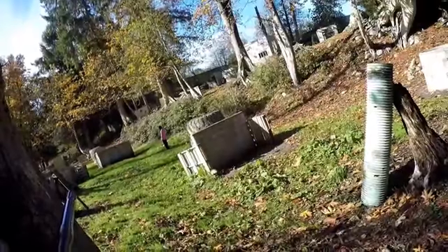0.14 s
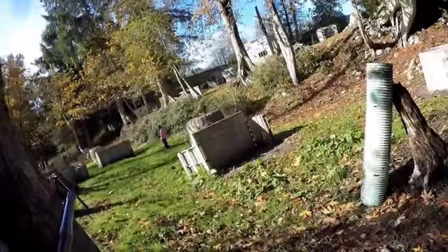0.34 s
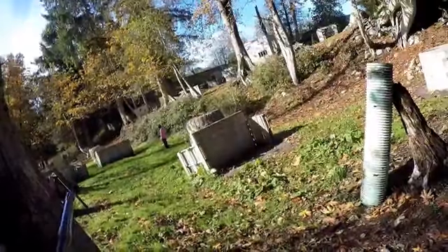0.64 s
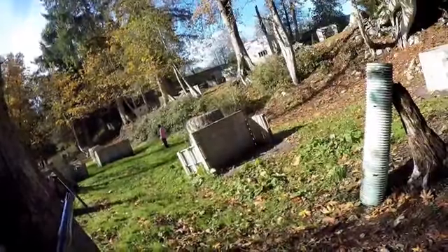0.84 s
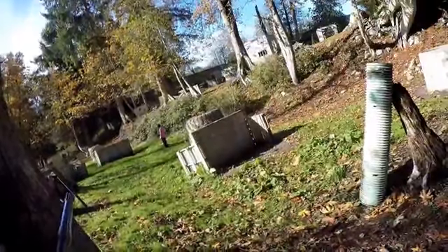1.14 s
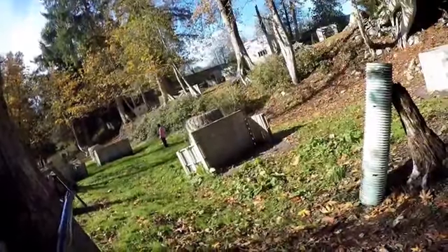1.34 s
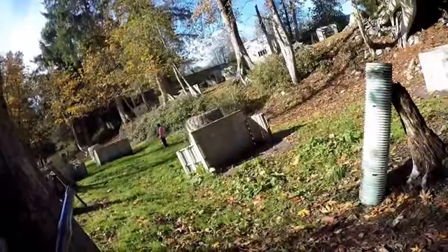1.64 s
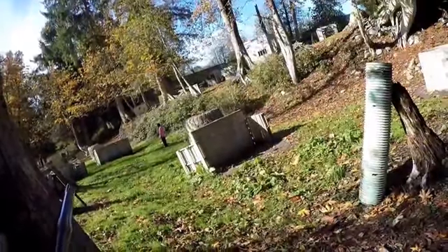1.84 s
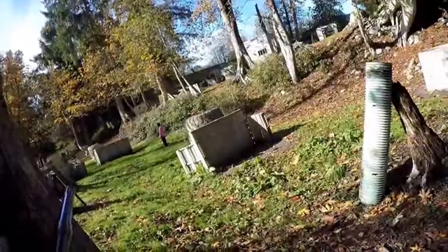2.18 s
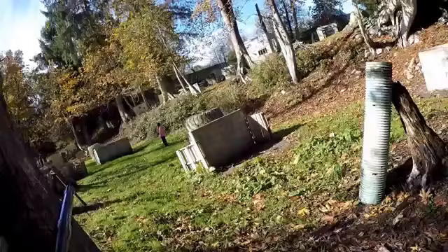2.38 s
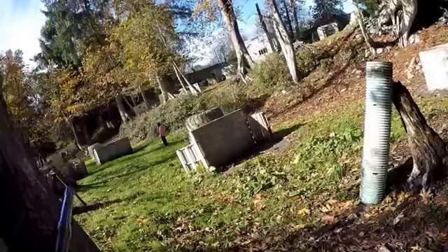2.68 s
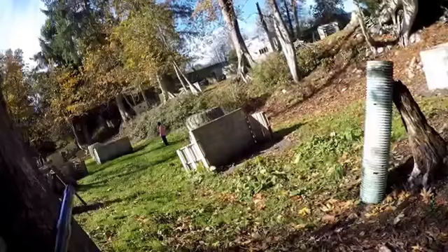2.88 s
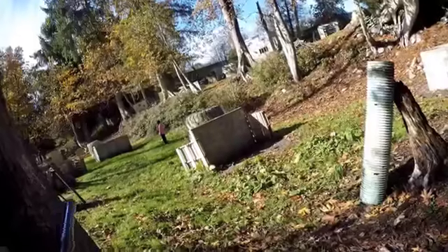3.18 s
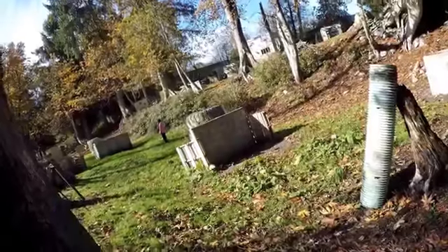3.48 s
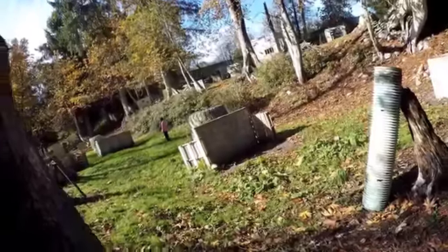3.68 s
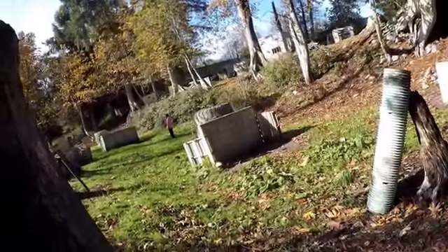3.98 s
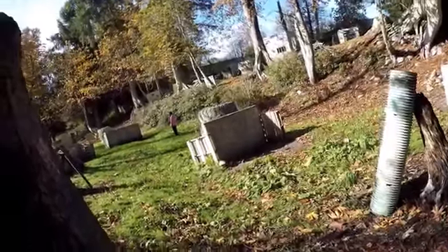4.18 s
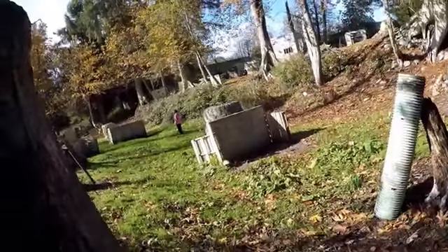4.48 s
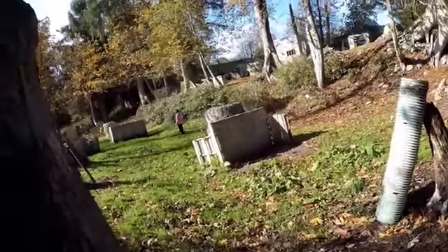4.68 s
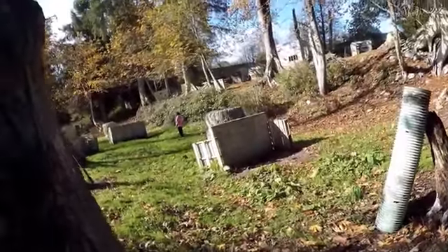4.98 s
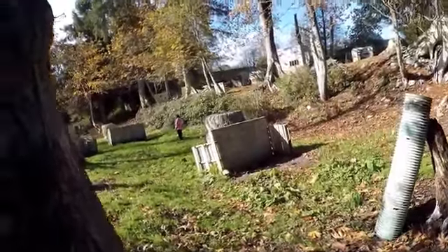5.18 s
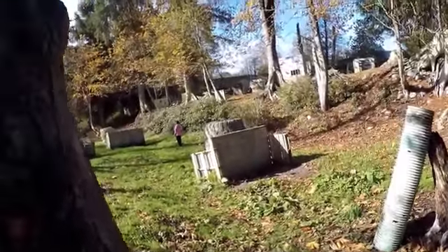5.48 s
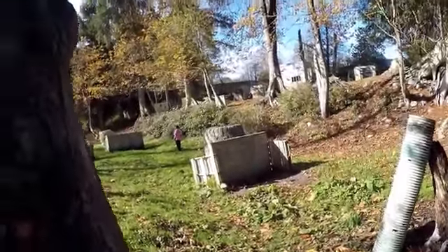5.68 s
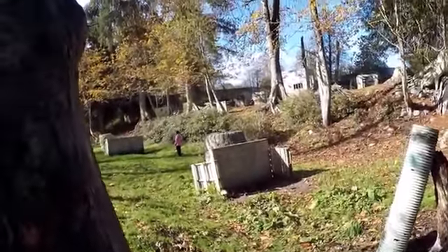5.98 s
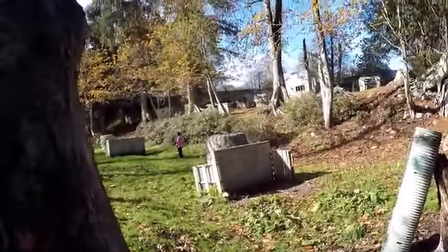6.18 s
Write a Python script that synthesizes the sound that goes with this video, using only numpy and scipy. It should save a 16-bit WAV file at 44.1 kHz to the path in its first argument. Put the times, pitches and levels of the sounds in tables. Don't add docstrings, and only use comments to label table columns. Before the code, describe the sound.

Close to a small camera microphone outdoors, a paintball marker fires one hard, hollow metallic pop, then after a pause a quick pair, then three more. Each has a tiny trigger click, gas blast, bolt clack and short echo from the trees. Afterwards it is quiet: faint distant bursts, soft plastic knocks, a small crackling splatter of paint near the end, and low wind rumble.

```python
import sys
import numpy as np
from scipy import signal
from scipy.fft import rfft, irfft, next_fast_len
from scipy.io import wavfile

SR = 44100
rng = np.random.default_rng(int(sys.argv[2]) if len(sys.argv) > 2 else 0)


def boost(x):
    u = np.asarray(x, float) / 20
    return 10 ** u


def to_wav(s):
    ch = np.atleast_2d(s).T
    pcm = np.round(np.clip(ch, -1, 1) * 32767)
    wavfile.write(sys.argv[1], SR, pcm.astype(np.int16))


N = 279153

# start_s, blast_db, bolt_lag_s, seal (ball in barrel: -1 loose, 1 tight), echo_db
NEAR_SHOTS = [
    (0.147, -11, 0.0045, -0.1, -50.5),
    (1.7339, -11.5, 0.0047, 0.43, -48),
    (1.8650, -10.5, 0.0045, 0.27, -47),
    (2.5430, -11.5, 0.0049, 0.026, -49.5),
    (2.7389, -12, 0.0039, -.9, -47),
    (2.8440, -10, 0.0053, 0.64, -47.5),
]
# pitch_hz, level_db, t60_s (time to die by 60 dB)
FRAME_MODES = [(963, -9, .07), (1870, -0.1, 0.038), (2410, -3, .05), (3600, -4, 0.036), (3873, -6.5, 0.028),
               (7400, -16, 0.043)]
# pitch_hz, level_db (per Hz)
FAR_SPECTRUM = [(180, -27.5), (300, 3.5), (396, -17), (444, -2), (515, -16), (606, -13), (1400, -8.5),
                (1790, 1), (3490, -1), (4390, -8), (9030, -16.5), (10500, -20), (15000, -26)]
# pitch_hz, width_hz, lift_db
HOUSING_PEAKS = [(960, 120, 0), (1850, 110, 2), (2360, 62, 8), (3520, 390, 5.5), (3890, 150, 7.5),
                 (7250, 350, 4.5), (10250, 430, 5)]


def at_hz(points, hz):
    point_hz, point_db = np.transpose(points)
    return np.interp(np.log(hz + 1), np.log(point_hz), point_db)


def noise(spectrum, peaks=()):
    size = next_fast_len(N)
    hz = np.arange(size // 2 + 1) * SR / size
    db = at_hz(spectrum, hz)
    for centre_hz, width_hz, lift_db in peaks:
        db = db + lift_db / (1 + (2 * (hz - centre_hz) / width_hz) ** 2)
    x = irfft(rfft(rng.standard_normal(size)) * boost(db), size)[:N]
    return x / np.std(x)


def drift(rate_hz):
    knots = rng.standard_normal(N // 64 + 2)
    smoother = signal.butter(1, rate_hz * 128 / SR, output="sos")
    slow = signal.sosfiltfilt(smoother, knots)
    return np.interp(np.arange(N) / 64, np.arange(len(slow)), slow / np.std(slow))


def clicks(times, db):
    out = np.full(N, 1e-18)
    places = (np.asarray(times) * SR).round().astype(int)
    np.add.at(out, np.clip(places, 0, N - 1), boost(db))
    return out


def ring(x, hz, t60):
    radius = boost(-60 / (t60 * SR))
    angle = 2 * np.pi * hz / SR
    return signal.lfilter([0, np.sin(angle)], [1, -2 * radius * np.cos(angle), radius * radius], x)


def strike(times, db, modes, spread_db):
    luck = spread_db * rng.standard_normal((len(times), len(modes)))
    out = np.zeros(N)
    for k, (hz, level_db, t60) in enumerate(modes):
        out += (-1) ** k * ring(clicks(times, db + level_db + luck[:, k]), hz, t60)
    return out


def fade(times, db, rise_s, t60):
    fall = boost(-120 / (t60 * SR))
    rise = np.exp(-1 / (rise_s * SR))
    power = signal.lfilter([1 - rise], [1, -rise], clicks(times, 2 * np.asarray(db)))
    return np.sqrt(signal.lfilter([1], [1, -fall], power))


def puff(times, db, rise_s, hold_s, fall_s):
    out = np.zeros(N)
    t = np.arange(SR // 20) / SR
    shape = np.clip(t / rise_s, 0, 1) * np.exp(-np.maximum(t - rise_s - hold_s, 0) / fall_s)
    for s, level_db in zip(times, db):
        out[round(s * SR):][:len(t)] += boost(level_db) * shape
    return out


def salvo(times, db, steps):
    after, step_db = np.transpose(steps)
    return (times[:, None] + after).ravel(), (db[:, None] + step_db).ravel()


def swells(rows):
    t = np.arange(N) / SR
    return sum(boost(2 * db) * np.exp(-((t - s) / length) ** 2) for s, db, length in rows)


def band_filter(x, order, edge_hz, kind):
    return signal.sosfilt(signal.butter(order, edge_hz, kind, fs=SR, output="sos"), x)


def barrel():
    # after_s, level_db
    surges = [
        (0, -5),
        (.0005, 4.5),
        (.0013, -3.5),
        (.0023, -3.5),
        (.0033, -8.5),
        (.0062, -14.5),
    ]
    # pitch_hz, level_db, t60_s
    groups = [
        [(389, -11, 0.024), (538, -15.5, 0.025)],
        [(786, -14.5, 0.026), (1180, -13, 0.0053), (1520, -12.5, 0.0076)],
        [(1931, -1.5, .022)],
        [(2493, -6, .016)],
        [(3070, -7.5, 0.014), (3450, -5.5, 0.019), (3880, -14.5, 0.01177)],
    ]
    lifts = [0, -5.5, -1, 0.1, -2.5]
    seal_lifts = [1.5, -9, 3, -0.17, -3.5]
    # spread_db, the chance in each drive; the breech is steadiest
    spreads = [1.5, 3.3, 2.2, 2.2, 2.5]
    s, blast_db, _, seal, _ = np.transpose(NEAR_SHOTS)
    rung = []
    for group, lift_db, seal_db, spread_db in zip(groups, lifts, seal_lifts, spreads):
        times, db = salvo(s, blast_db + lift_db + seal_db * seal, surges)
        rung.append(strike(times, db, group, spread_db))
    breech, *bore = rung
    return -band_filter(sum(bore), 2, [620, 6000], "band") - band_filter(breech, 4, 310, "high")


def bolt():
    # pitch_hz, level_db, t60_s
    modes = [(3565, -10.5, 0.01172), (5720, -8, 0.012), (6940, 0.1, 0.0051), (7540, -11.5, 0.0076),
             (9560, -10.5, 0.011), (10870, -16, 0.016), (13240, -20, 0.008)]
    # after_s, level_db
    chatter = [
        (0, 4.5),
        (.0007, -8),
        (.0019, -4.5),
        (.003, -5),
    ]
    s, blast_db, lag, seal, _ = np.transpose(NEAR_SHOTS)
    times, db = salvo(s + lag, blast_db - 4.5 + 2.2 * seal, chatter)
    return strike(times, db, modes, spread_db=2.2)


def sear(hiss):
    # start_s, level_db
    snaps = [
        (.1256, -28),
        (1.7120, -27.5),
        (1.8445, -29.5),
        (2.5220, -28),
        (2.7183, -29.5),
        (2.8247, -28),
    ]
    # pitch_hz, level_db, t60_s
    modes = [(449, -12, 0.016), (1000, 4.5, 0.0051), (1870, -3, 0.021), (3377, -5.5, 0.01206),
             (5070, -10, .015), (7000, -8, .012)]
    s, db = np.transpose(snaps)
    out = strike(s, db, modes, spread_db=0.0)
    out += puff(s, db - 7, 0.00038, 0.0012, 0.0047) * hiss
    return out + ring(clicks(s - .002, db - 20), 7100, 0.0081)


def vent(hiss):
    s, blast_db, _, seal, _ = np.transpose(NEAR_SHOTS)
    rush = puff(s + 0.0011, blast_db - 8 - 4.5 * seal, 0.0029, 0.0022, 0.0022)
    leak = puff(s - .0045, blast_db - 35.5, 0.00089, .004, .001)
    return hiss * (rush + leak)


def recoil():
    s, blast_db = np.transpose(NEAR_SHOTS)[:2]
    out = strike(s + .004, blast_db - 23, FRAME_MODES, spread_db=4.5)
    out += ring(clicks(s + 0.0014, blast_db - 20), 80, 0.1)
    out += ring(clicks(s + 0.0053, blast_db - 22.5), 150, .06)
    return out + ring(clicks(s + 0.0035, blast_db - 16.5), 220, 0.03)


def marker():
    # pitch_hz, level_db (per Hz)
    gas = [(300, -21), (900, -11.5), (2000, -2.5), (3700, -4.5), (4830, -7.5), (5800, -4), (6960, -3.5),
           (8360, -16), (9710, -11.5), (12900, -11.5), (14500, -11.5), (16000, -30)]
    hiss = noise(gas)
    return sear(hiss) + barrel() + bolt() + vent(hiss) + recoil()


def hopper():
    s, *_, echo_db = np.transpose(NEAR_SHOTS)
    out = strike(s + 0.044, echo_db + 13, FRAME_MODES[3:], spread_db=0.0)
    after = 0.01 + 0.22 * rng.random((len(s), 20)) ** 1.3
    knock_db = echo_db[:, None] + 2 - 60 * after
    short = [(hz, level_db, 0.26 * t60) for hz, level_db, t60 in FRAME_MODES]
    return out + strike((s[:, None] + after).ravel(), knock_db.ravel(), short, spread_db=5.0)


def echoes(shot):
    # delay_s, level_db
    trunks = [
        (0.011, -31),
        (0.056, -33.5),
        (.085, -43),
        (0.104, -48),
        (.14, -48),
    ]
    # pitch_hz, level_db (per Hz)
    rattle = [(88, -33), (150, -8.5), (249, -6.5), (398, 4.5), (524, -11), (1360, -12), (1830, 0.5),
              (2700, -17), (3550, -7.5), (6140, -11.5), (11000, -12), (15100, -14.5), (16000, -59.5)]
    # pitch_hz, level_db (per Hz)
    woods = [(120, -59.5), (200, -30), (267, -8), (338, -21), (443, -5.5), (804, -10.5), (980, 1),
             (1110, -16.5), (1880, -4), (2020, -4), (15000, -27)]
    s, *_, echo_db = np.transpose(NEAR_SHOTS)
    dull = band_filter(shot, 2, [700, 4500], "band")
    out = sum(boost(db) * np.roll(dull, round(delay * SR)) for delay, db in trunks)
    early = fade(s + 0.011, echo_db + 15, .003, 0.1)
    out += early * noise(rattle, HOUSING_PEAKS) * boost(0.83 * drift(90))
    late = fade(s + 0.015, echo_db, .02, .6)
    return out + late * noise(woods, HOUSING_PEAKS) * boost(2.7 * drift(40))


def splats():
    # start_s, peak_db
    bursts = [
        (4.9245, -33.5),
        (4.9305, -34),
        (4.9354, -35.5),
        (4.9444, -34.5),
        (4.9524, -42),
    ]
    # pitch_hz, level_db, t60_s
    modes = [(420, -17, 0.039), (1570, -8, 0.017), (2370, 0.5, 0.012), (3640, 0.6, 0.017), (4020, -1, 0.01),
             (5660, -6, 0.0076), (7670, -11.5, 0.0087)]
    s, db = np.transpose(bursts)
    out = strike(s, db - 7, modes, spread_db=2.0)
    out += fade(s, db - 20.5, 0.0017, 0.32) * noise(FAR_SPECTRUM, HOUSING_PEAKS)
    tail = [(900, -30), (1500, -10.5), (1900, -4), (2600, -15), (3600, -8.5), (5000, -27.5)]
    return out + fade(s[:1], db[:1] - 27.5, .02, 1.4) * noise(tail, HOUSING_PEAKS)


def scuffs():
    # start_s, peak_db
    snaps = [
        (0.43, -44.5),
        (0.863, -55),
        (0.935, -43.5),
        (1.3495, -43),
    ]
    # pitch_hz, level_db (per Hz)
    colour = [(1000, -12), (2200, 1), (2900, -9.5), (3600, 4.5), (4500, -17), (5600, -15), (8000, -9),
              (9500, -25)]
    s, db = np.transpose(snaps)
    return puff(s - .003, db - 12, 0.0032, .003, 0.01) * noise(colour)


def far_marker():
    # start_s, report_db, late_echo_db
    far_shots = [(.002, -52, -56.5), (.51, -67, -65), (2.035, -53.5, -56.5), (2.135, -54, -56),
                 (2.226, -53.5, -55.5), (2.96, -60, -51.5), (3.054, -55.5, -56.5), (3.24, -55.5, -55),
                 (3.34, -57, -54.5), (3.425, -57, -57.5), (4.053, -56, -55.5), (4.152, -56.5, -50.5),
                 (4.246, -53.5, -58), (5.68, -55.5, -55.5), (5.787, -57.5, -55), (5.87, -55.5, -57),
                 (5.968, -55, -54.5), (6.045, -59, -55.5)]
    s, report_db, late_db = np.transpose(far_shots)
    wash = np.hypot(fade(s, report_db, 0.0037, 0.17), fade(s + 0.0099, late_db + 3, 0.03, 0.34))
    out = wash * noise(FAR_SPECTRUM, HOUSING_PEAKS) * boost(1.3 * drift(45))
    bright = [(5000, -28), (7300, -10), (9000, -13), (10400, -1.5), (11500, -4), (12800, -5), (15000, -5)]
    bright_peaks = [(10400, 350, 6.8), (12800, 400, 4), (7250, 300, 5)]
    out += fade(s, report_db - 10, .004, .35) * noise(bright, bright_peaks)
    thud = [(120, -18), (230, -1.0), (310, 2.5), (600, -19), (2000, -36)]
    return out + fade(s, report_db - 5.5, 0.0027, 0.16) * noise(thud)


def gear():
    # start_s, peak_db, pitch_hz
    knocks = [(0.3431, -51, 1500), (3.715, -48.5, 2276), (3.8856, -49.5, 1520), (4.0302, -51, 1643),
              (4.0562, -53, 1810), (4.152, -47, 1770), (0.712, -60, 875), (3.68, -56, 937),
              (3.884, -56, 1076), (3.941, -68, 966), (4.014, -56.5, 927), (4.065, -50.5, 1006),
              (4.145, -54.5, 977), (4.485, -57, 1250), (4.585, -55.5, 967), (4.759, -57.5, 1078),
              (4.853, -58.5, 1058), (5.533, -54.5, 1050), (5.605, -61, 850), (3.692, -62, 620),
              (4.029, -56.5, 527), (4.6668, -54, 5610), (5.0584, -58, 5580)]
    out = np.zeros(N)
    age = np.arange(2000) / SR
    for s, db, hz in knocks:
        swell = (1 - np.exp(-age / 0.0018)) * np.exp(-age / (.001 + 3.1 / hz))
        knock = swell * np.sin(2 * np.pi * hz * age)
        knock += boost(-9.0) * np.exp(-age / 0.0009) * np.sin(2 * np.pi * 1.3 * hz * age)
        out[round((s - .002) * SR):][:2000] += boost(db + 5.5) * knock
    s, db, _ = np.transpose(knocks)
    contact = [(400, -12), (1200, 0), (4000, -4), (9000, -14), (15000, -25)]
    return out + puff(s - .001, db - 14, .0005, .001, .003) * noise(contact)


def mount():
    # start_s, peak_db, pitch_hz, length_s
    shudders = [
        (0.699, -44.5, 67.3, 0.029),
        (3.897, -45, 31.4, 0.02),
        (5.117, -45, 55, 0.023),
        (5.902, -40, 67.9, 0.028),
        (5.961, -32.5, 66.6, 0.016),
        (6.23, -36.5, 62, 0.013),
    ]
    out, t = np.zeros(N), np.arange(N) / SR
    for s, db, hz, length in shudders:
        near = slice(round((s - .2) * SR), round((s + .2) * SR))
        age = t[near] - s
        tone = np.cos(2 * np.pi * hz * age) + 0.097 * np.cos(4 * np.pi * hz * age)
        out[near] += boost(db) * np.exp(-.5 * (age / length) ** 2) * tone
    return out


def wind():
    # time_s, level_db
    gusts = [(0.0, -45), (0.3, -45), (0.42, -63), (0.53, -51), (1.53, -53), (1.99, -41), (2.03, -52),
             (2.52, -54), (2.57, -44), (2.94, -42), (3.05, -55), (3.51, -46), (4.53, -50), (4.58, -63),
             (4.71, -46), (4.81, -54), (6.28, -53), (6.33, -57)]
    # pitch_hz, level_db (per Hz)
    rumble = [(8.8, -30.5), (15, 1), (27, 1.5), (39, -2), (70, -9.5), (92, -14.5), (168, -33.5),
              (250, -32.5), (320, -60), (550, -120)]
    # start_s, level_db, length_s
    buffets = [(.01, -47.5, 0.054), (.6, -47, 0.12), (1.45, -47.5, .08), (1.86, -47, .03),
               (2.87, -43, 0.043), (3.3, -48.5, .12), (4.0, -57, .05), (4.27, -54, .03), (5.92, -44, 0.087),
               (6.22, -51, 0.028)]
    wind_db = np.interp(np.arange(N) / SR, *np.transpose(gusts))
    s, blast_db = np.transpose(NEAR_SHOTS)[:2]
    pressure = noise(rumble)
    sway = fade(s + .06, blast_db - 32, .04, 0.37)
    push = boost(wind_db - .3 + 2.5 * drift(5.0))
    out = np.hypot(push, sway) * band_filter(pressure, 4, 50, "low")
    flutter_db = -54 + 0.37 * (wind_db - wind_db.mean())
    flutter = np.sqrt(boost(2 * flutter_db) + swells(buffets))
    return out + flutter * boost(2.4 * drift(9)) * band_filter(pressure, 4, 50, "high")


def leaves():
    # start_s, level_db, length_s
    rustles = [
        (.0, -60, .07),
        (.26, -66, .07),
        (2.93, -50.5, 0.077),
        (3.72, -68.5, .1),
        (4.03, -66.5, .12),
        (4.55, -72, 0.0695),
        (4.92, -70, .1),
        (5.88, -68, .07),
    ]
    colour = [(250, -23), (600, -7), (1000, -4.5), (1500, -4), (3000, -18.5), (9000, -49)]
    level = np.sqrt(boost(2 * -78) + swells(rustles))
    return level * boost(1.4 * drift(25)) * noise(colour, [(966, 180, 8)])


def field():
    # pitch_hz, level_db (per Hz)
    hush = [(71, -29.5), (120, -1), (222, -8.5), (727, -12), (1140, -16.5), (1240, -14), (1940, -10.5),
            (3450, -13.5), (4410, -18.5), (4880, -16), (6110, -20), (8480, -24), (10400, -25), (14400, -26),
            (16000, -54)]
    peaks = [(hz, width_hz, 0.36 * db) for hz, width_hz, db in HOUSING_PEAKS]
    return boost(-64 + .6 * drift(2.3)) * noise(hush, peaks)


def electronics():
    # pitch_hz, wobble_hz, level_db
    whistles = [(4770, 51.2, -76), (8640, 12, -85.5), (14277, 99, -87)]
    out = np.zeros(N)
    for hz, wobble_hz, db in whistles:
        phase = 2 * np.pi * np.cumsum(hz + wobble_hz * drift(150)) / SR
        out += boost(db + 2 + 2.2 * drift(90)) * np.sin(phase)
    return out


def scene():
    shot = marker()
    near = shot + hopper() + echoes(shot) + splats() + scuffs()
    background = far_marker() + gear() + mount() + wind() + leaves() + field() + electronics()
    return (near + background)[None]


def roll_off(x):
    return signal.sosfilt(signal.butter(12, 16290, fs=SR, output="sos"), x)


def record(dry):
    rounded = 0.96 * np.tanh(dry / 0.88)
    cut = signal.ellip(10, .3, 30, 15000, fs=SR, output="sos")
    return roll_off(signal.sosfilt(cut, rounded))


dry = scene()
out = record(dry)
to_wav(out)
```